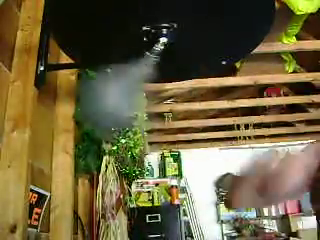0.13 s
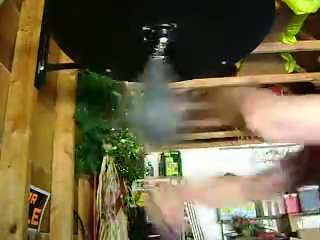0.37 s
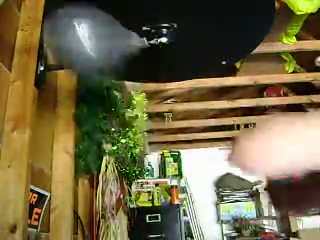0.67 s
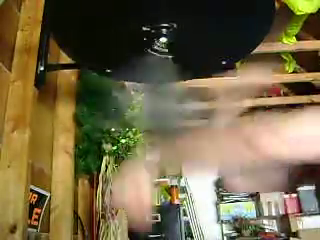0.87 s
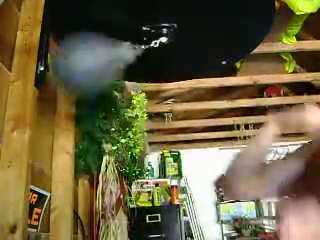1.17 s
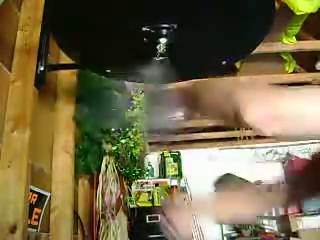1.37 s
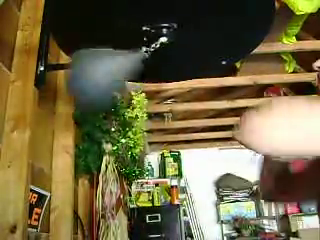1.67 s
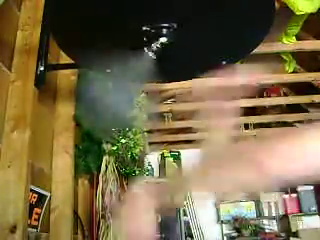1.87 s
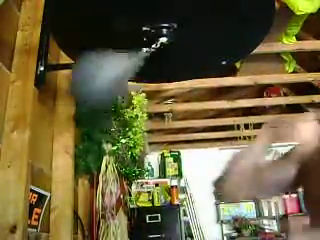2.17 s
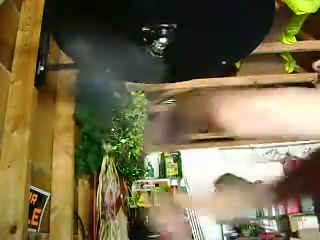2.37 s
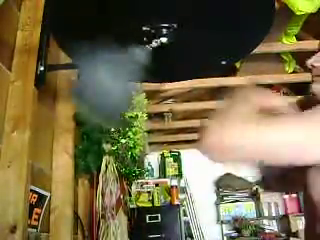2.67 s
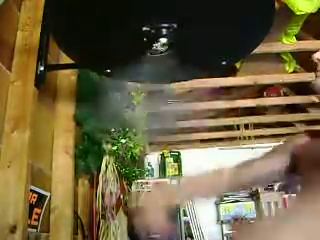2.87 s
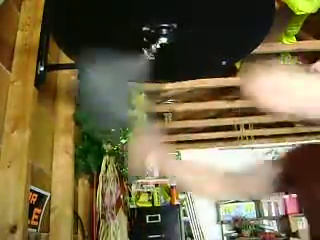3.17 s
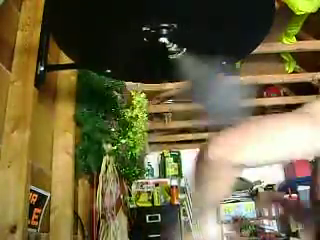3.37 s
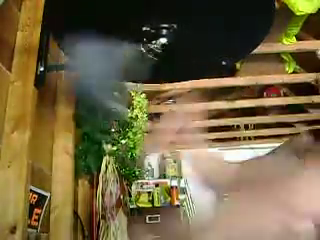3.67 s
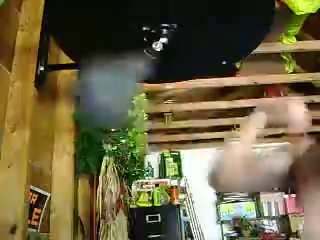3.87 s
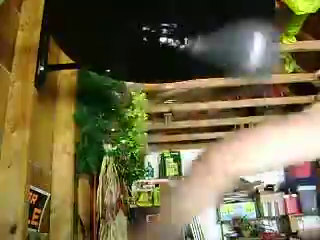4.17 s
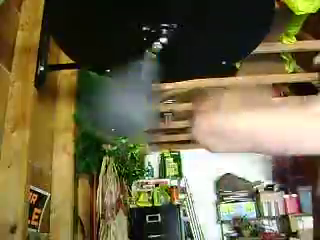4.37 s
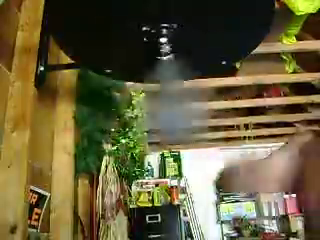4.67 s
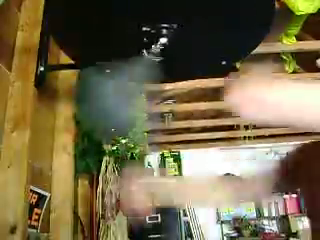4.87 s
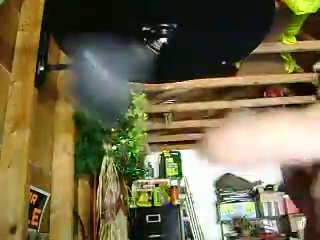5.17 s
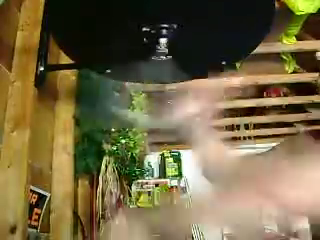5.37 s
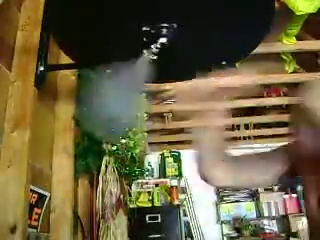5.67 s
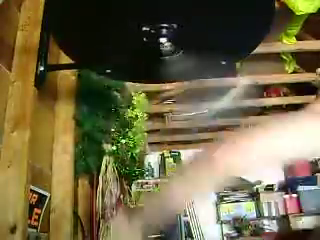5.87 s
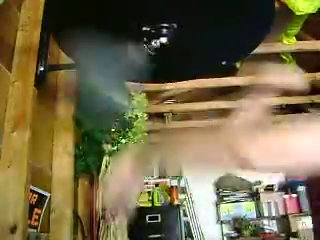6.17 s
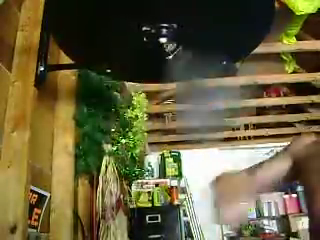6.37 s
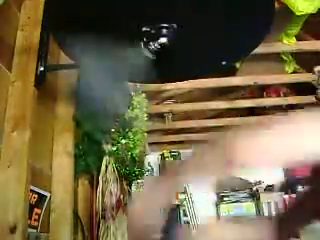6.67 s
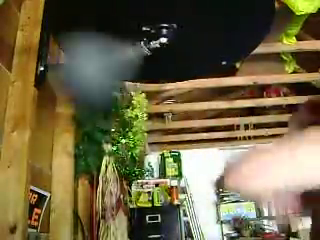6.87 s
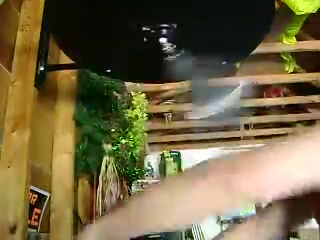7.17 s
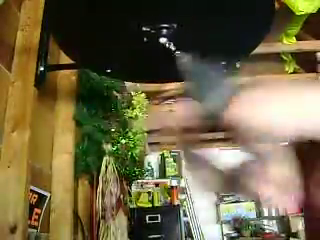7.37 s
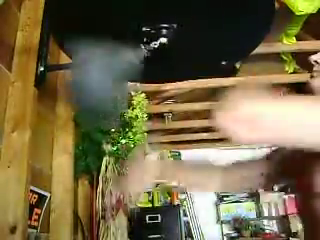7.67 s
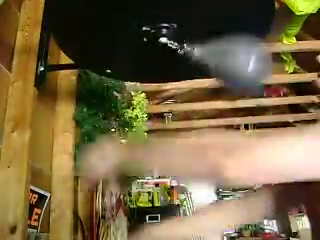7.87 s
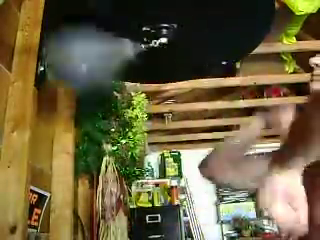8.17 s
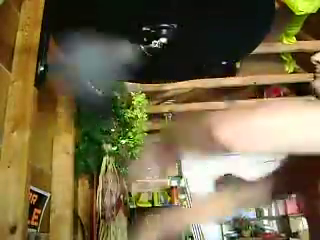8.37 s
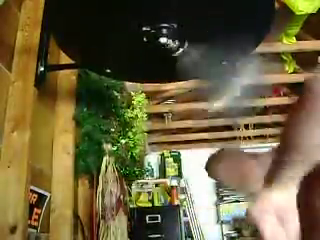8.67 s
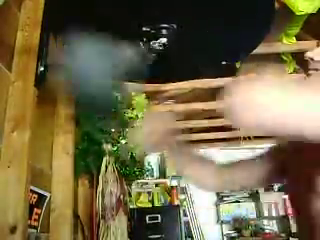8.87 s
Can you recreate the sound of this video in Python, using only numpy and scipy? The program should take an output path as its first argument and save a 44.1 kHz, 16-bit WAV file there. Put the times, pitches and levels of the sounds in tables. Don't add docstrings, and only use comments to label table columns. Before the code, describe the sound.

A leather speed bag rattles fast against its wooden rebound board in a garage, punched about twice a second, harsh and overloaded up close.

```python
import sys
import numpy as np
from scipy import signal
from scipy.fft import rfft, irfft, next_fast_len
from scipy.io import wavfile

SR = 44100
rng = np.random.default_rng(int(sys.argv[2]) if len(sys.argv) > 2 else 0)


def invert_db(x):
    u = np.asarray(x, float) / 20
    return 10 ** u


def to_wav(sig):
    pcm = np.clip(np.atleast_2d(sig), -1, 1) * 32767
    pcm = np.round(pcm).astype(np.int16)
    wavfile.write(sys.argv[1], SR, pcm.T)


N = 397782


def evened(x):
    return x / np.sqrt(np.mean(x ** 2) + 1e-20)


def peaked(x):
    return x / abs(x).max()


def read(points, hz):
    f, value = np.transpose(points)
    return np.interp(np.log(hz + 1), np.log(f + 1), value)


def coloured(x, points):
    size = next_fast_len(len(x))
    gain = invert_db(read(points, np.fft.rfftfreq(size, 1 / SR)))
    return irfft(rfft(x, size) * gain, size)[:len(x)]


def low_cut(x, order=4):
    return signal.sosfilt(signal.butter(order, 66, "high", fs=SR, output="sos"), x)


def add(mix, s, sound):
    part = mix[max(round(s * SR), 0):][:len(sound)]
    part += sound[:len(part)]


def ring(modes, seconds, spread, scatter_db):
    hz, db, t60 = np.transpose(modes)[:, :, None]
    pitch_luck, level_luck = rng.standard_normal((2, len(modes), 1))
    t = np.arange(round(seconds * SR)) / SR
    decay = invert_db(db + scatter_db * level_luck - 60 * t / t60)
    return (decay * np.sin(2 * np.pi * hz * (1 + spread * pitch_luck) * t)).sum(0)


# (time [s], slap level [dB], mount shake over slap [dB], contact [ms])
SECOND_REBOUNDS = [(.001, 2.5, -10, 4.2), (.494, 5, -17, 7.2), (1.002, 9.5, -16, 6.8),
                   (1.483, 6.5, -15, 10), (2.005, 0, -11.5, 6.8), (2.476, 2, -11.5, 3.1),
                   (2.918, 4, -12.5, 3), (3.326, 5.5, -17, 5.1), (3.763, 8.5, -17.5, 7.4),
                   (4.169, 3, -9.5, 5.9), (4.608, 5.5, -11.5, 8.1), (5.02, 4, -18.5, 7.4),
                   (5.458, 4.5, -8.5, 4.8), (5.871, 6, -13.5, 6.5), (6.3, 6.5, -14, 3.4),
                   (6.715, 4, -12.5, 7.8), (7.164, 4, -16, 8), (7.466, -2, -16, 6.5),
                   (7.808, 0.5, -18, 3.8), (8.112, -1, -15.5, 5.7), (8.436, -2, -9.5, 3.1),
                   (8.709, 1, -17, 8.8)]
# (time [s], slap level [dB], mount shake over slap [dB])
THIRD_REBOUNDS = [(.093, -2.5, -15), (.597, -9, -7.5), (1.099, .5, -15), (1.584, -2.5, -13),
                  (2.101, 0.5, -16), (2.568, -5.5, -11), (3.005, 4, -18), (3.419, -6.5, -14),
                  (3.852, -0.5, -17), (4.26, 0.5, -15.5), (4.693, -0.5, -13.5), (5.116, 3, -20.5),
                  (5.547, -1.5, -12), (5.963, 0.5, -13.5), (6.384, 4, -22), (6.807, 2, -15.5),
                  (7.265, -1, -17), (8.535, -12.5, -3.5)]
# (time [s], slap level [dB], mount shake over slap [dB])
SLUMPS = [(.123, -10.5, -13), (.627, -10, -11), (1.127, -21, -6), (1.617, -23, -19), (2.135, -11.5, -16),
          (2.595, -10.5, -12.5), (3.029, -10, -11.5), (3.446, -10.5, -8), (3.877, -9.5, -12),
          (4.721, -9, -15), (5.145, -10, -14), (5.573, -10.5, -26), (6.413, -14, -7), (6.834, -12, -13),
          (7.291, -7, -14.5), (7.435, -13, -25), (7.49, -7.5, -16), (7.625, -19, -17), (8.565, -16.5, -2),
          (8.654, -14.5, -16)]
# (time [s], slap level [dB], mount shake over slap [dB])
LAST_REBOUNDS = [(.253, -12, -8), (.756, -12.5, -11), (1.245, -6.5, -24.5), (1.742, -11, -12),
                 (2.257, -10.5, -16), (2.71, -8.5, -10.5), (3.135, -3.5, -22.5), (3.561, -9, -15),
                 (3.986, -10, -8.5), (4.396, -10, -10.5), (4.825, -13.5, -3.5), (5.259, -13.5, -13),
                 (5.678, -9, -11), (6.1, -10.5, -12.5), (6.507, -15, -4.5), (6.95, -9.5, -14),
                 (7.585, -7.5, -14), (7.933, -7.5, -12), (8.234, -16.5, -5), (8.831, -7.5, -19)]
# (time [s], slap level [dB], mount shake over slap [dB])
PUNCHES = [(0.353, -13, -3.5), (.857, -14, -10), (1.344, -9, -15), (1.862, -17, -29), (2.354, -11, -13),
           (2.797, -10.5, -10), (3.194, -13, -2), (3.636, -11, -4.5), (4.053, -9.5, -10),
           (4.482, -11, -14.5), (4.916, -10, -12.5), (5.329, -15, -12.5), (5.746, -14.5, 1.5),
           (6.178, -14, -6.5), (6.59, -11.5, -13), (7.053, -10, -9), (7.337, -17, -23), (7.676, -10, -13.5),
           (7.966, -22.5, 1), (8.319, -9.5, -12), (8.595, -10.5, -19), (8.906, -10.5, -12.5)]
# (time [s], slap level [dB], mount shake over slap [dB])
CATCHES = [(0.379, -23, 6), (0.431, -8.5, -1), (0.548, -7.5, -18), (0.952, -10, -3.5), (1.433, -15.5, 4),
           (1.988, -15, -12), (2.038, -5.5, -12), (2.438, -0.5, -8.5), (2.881, -6.5, -4),
           (3.651, -15, 11.5), (3.726, -4, -8.5), (4.069, -12.5, -18.5), (4.135, -6, -6.5),
           (4.573, 3, -14.5), (5.07, -11, -6), (5.395, -12, -1), (5.422, -1.5, -30), (6.268, -8, -4),
           (6.341, -11, -16), (6.605, -13, -2), (7.132, -6.5, -4.5), (7.415, -7, -13.5), (7.758, -11.5, 0),
           (8.079, -5, -18), (8.487, -13.5, -32), (8.677, 1, -22), (8.99, -5, -14)]
# (time [s], slap level [dB], mount shake over slap [dB], contact [ms])
FIRST_REBOUNDS = [(.395, 4, -18, 6.7), (.899, 5.5, -16.5, 4.5), (1.384, 3, -10.5, 4.5),
                  (1.916, 2.5, -14, 3.3), (2.393, 4, -15, 7.9), (2.832, 4, -12.5, 3.4),
                  (3.235, 5.5, -10.5, 5.2), (3.664, 2, -18, 3.5), (4.085, 3.5, -20.5, 5.6),
                  (4.516, 3.5, -14, 4.8), (4.93, -2, -6.5, 11), (5.348, -6, -5.5, 3.4), (5.782, 0, -7, 4.5),
                  (6.212, 6.5, -16.5, 3.4), (6.623, 2, -12, 4.1), (7.091, 9, -20.5, 6.1),
                  (7.354, -1.5, -5, 4.1), (7.722, 1, -15.5, 4.1), (8.027, -2.5, -9.5, 5.3),
                  (8.359, 3.5, -13.5, 2.6), (8.629, -0.5, -13, 10.7), (8.945, 2.5, -16, 7.1)]
# (thump over slap [dB], leather crack over slap [dB], contact [ms], air gap [Hz])
KINDS = [
    (-15.5, -22.5, 5, 720),
    (-18.5, -16.5, 6.44, 1050),
    (-18, -15, 6.9, 1050),
    (-29.5, -18, 3.7, 1050),
    (-31, -17.5, 3.7, 997),
    (-17.5, -20, 6.1, 800),
    (-19, -32.5, 11.4, 1250),
]
# (time [s], thump level [dB])
WEIGHT = [(0, -0.5), (1, -2.5), (1.8, -1.5), (2.4, 0.5), (3, 3), (4.3, 1), (5.5, 3), (6.4, 0.5), (7.2, 1.5),
          (7.6, -2), (9, 0.5)]
CLACK = (-25, -4, 17, 1000)
BRUSH = (-35, -28.5, 11, 1100.5)


def contacts():
    tables = (PUNCHES, FIRST_REBOUNDS, SECOND_REBOUNDS, THIRD_REBOUNDS, LAST_REBOUNDS, CATCHES, SLUMPS)
    rows = []
    for table, (thump, crack, usual_ms, gap) in zip(tables, KINDS):
        for s, slap, shake, *own_ms in table:
            ms = own_ms[0] if own_ms else usual_ms
            rows.append((s, slap, thump, crack, ms, gap, shake))
    for table, clack_db in ((LAST_REBOUNDS, -14), (PUNCHES, -15)):
        for s, slap, shake in table:
            rows.append((s + 0.010, slap + clack_db, *CLACK, shake))
    for s, slap, shake in LAST_REBOUNDS + THIRD_REBOUNDS:
        rows.append((s - 0.0081, slap - 14, *BRUSH, shake))
    rows = np.array(rows)
    rows[:, 2] += np.interp(rows[:, 0], *np.transpose(WEIGHT))
    return rows


# (frequency [Hz], level [dB])
BOARD = [(250, -26.5), (400, -66.5), (600, -10), (850, -12.5), (1100, 19), (1300, -3), (1700, 16.5),
         (2700, -21.5), (3300, 7.5), (5600, -16.5)]
# (frequency [Hz], t60 [s])
BOARD_RING = [(250, .04), (600, .035), (1300, .022), (3000, .012), (5600, .008)]


def board_modes(count=90):
    place = (np.arange(count) + rng.random(count)) / count
    hz = 260 * (5600 / 260) ** place
    return np.c_[hz, read(BOARD, hz) + 5 * np.log10(hz / 1000), read(BOARD_RING, hz)]


# (frequency [Hz], level [dB], t60 [s])
FRAME = [(80, 1, 0.1), (98, -3.5, 0.12), (122, 2, 0.06), (141, 2, 0.1), (166, 4.5, 0.08), (215, -5, 0.04)]
# (frequency [Hz], level [dB], t60 [s])
BAG_AIR = [(599.7, -3, 0.083), (567.4, -9, 0.13), (1255.5, -2.5, 0.071)]


def contact(board_ring, slap_db, thump_db, crack_db, ms, gap_hz=950):
    t = np.arange(3000) / SR
    u = t / (max(ms, .5) / 1000)
    first_touch = 1.1
    pressure = (1 - np.exp(-t / .0003)) * np.exp(-u ** 2)
    pressure *= (1 + first_touch * np.exp(-t / .0015)) / (1 + first_touch / 2)
    gap_noise, leather_noise = rng.standard_normal((2, len(t)))

    wandering_t = t + 0.00058 * np.cumsum(gap_noise) / 30
    squeeze = pressure * np.sin(2 * np.pi * gap_hz * rng.uniform(0.78, 1.4) * wandering_t)
    blow = gap_noise[:900] * pressure[:900]

    push = signal.windows.hann(round(0.0032 * SR))
    thump = -peaked(signal.fftconvolve(push, ring(FRAME, .2, .02, 2)))

    creak = 0.12 * np.exp(-t / 0.0071) + 0.055 * np.cos(np.pi / 2 * t / t[-1]) ** 2
    leather = signal.lfilter(*signal.butter(2, (2700, 6300), "band", fs=SR), leather_noise)
    crack = leather * (pressure * np.exp(-.4 * u) + creak)

    smack = (1 - t / 0.000094) * np.exp(-t / 0.00011)

    slap = np.zeros(round(.25 * SR))
    add(slap, 0, peaked(signal.fftconvolve(blow, board_ring)))
    add(slap, 0, invert_db(-5.5) * peaked(signal.fftconvolve(blow, ring(BAG_AIR, 0.23, 0.02, 5.0))))
    add(slap, 0, invert_db(6.0) * squeeze)
    add(slap, 0, invert_db(thump_db + 19) * smack)
    out = peaked(slap)
    add(out, .0025, invert_db(thump_db + 6.5) * thump)
    add(out, .0004, invert_db(crack_db + 8) * peaked(crack))
    return invert_db(slap_db + 1.5) * out


def bag(count=40):
    spots = [ring(board_modes(), .06, .001, 5.3) for _ in range(count)]
    out, rows = np.zeros(N), contacts()
    delay_s = .0007
    luck = rng.standard_normal((len(rows), 3))
    for k, (s, slap_db, thump_db, crack_db, ms, gap_hz, _) in enumerate(rows):
        thump_db += 2.5 * luck[k, 0]
        crack_db += 2.5 * luck[k, 1]
        ms *= np.exp(0.25 * luck[k, 2])
        add(out, s + delay_s, contact(spots[k % count], slap_db, thump_db, crack_db, ms, gap_hz))
    return out


# (frequency [Hz], level per Hz [dB])
RATTLE = [(150, -22), (250, -9.5), (285, -13.5), (447, -4), (575, 0.5), (656, 1), (1270, -2.5), (1370, -5),
          (2730, -18.5), (4640, -22.5), (5360, -26), (5880, -23), (7640, -40), (12900, -120)]


def mount():
    s, slap_db, thump_db, _, _, _, shake_db = contacts().T
    kicks = np.zeros((2, N))
    kicks[:, (s * SR).astype(int)] = invert_db([slap_db + shake_db, slap_db + thump_db])
    kicks[:, 0] = invert_db([-17, -40])
    t = np.arange(SR // 2) / SR
    build = 1 - np.exp(-(t / .012) ** 2)
    settle = [build * invert_db(-4.0 - 60 * t / 0.43), build * invert_db(-3.5 - 60 * t / 0.46)]
    energy = signal.fftconvolve(kicks ** 2, np.square(settle), axes=1)[:, :N]
    shake, sway = np.sqrt(abs(energy))

    knock_db = 2.2 * np.minimum(rng.exponential(1, N), 3)
    knocks = invert_db(knock_db) * (rng.random(N) < 1400 / SR)
    chatter = signal.oaconvolve(knocks, np.exp(-t[:800] / 0.0035))[:N] * rng.standard_normal(N)
    rumble = signal.oaconvolve(rng.standard_normal(N), ring(FRAME, .2, .001, .1))[:N]
    return shake * evened(coloured(chatter, RATTLE)) + invert_db(-5.5) * sway * evened(rumble)


# (frequency [Hz], t60 [s])
GARAGE = [(100, 0.69), (400, 0.63), (1000, 0.35), (2500, 0.58), (5500, 0.35)]


def garage(x):
    taps = np.zeros((3, SR // 2))
    slots = np.arange(260, SR // 2 - 20, 20)
    at = slots + rng.integers(0, 20, (3, (SR // 2 - 261) // 20))
    np.put_along_axis(taps, at, rng.choice([-1., 1.], at.shape), 1)
    hz, t, z = signal.stft(taps, SR, nperseg=256)
    decay = invert_db(-60 * t / read(GARAGE, hz)[:, None])
    tails = signal.istft(z * decay, SR, nperseg=256)[1]
    turn = 2 * np.pi * (3.7 * np.arange(N) / SR + np.arange(3)[:, None] / 3)
    share = np.sqrt((1 + np.cos(turn)) / 3)
    return signal.fftconvolve(x * share, tails / np.linalg.norm(tails[0]), axes=1)[:, :N].sum(0)


def scene():
    near = low_cut(bag() + mount())
    return (near + invert_db(-12.5) * garage(near))[None]


# (frequency [Hz], level per Hz [dB])
AIR = [(10, 2.5), (22, 19.5), (36, 11.5), (100, 11.5), (340, -9.5), (1000, 3), (2800, -12), (6000, -45.5)]


def still_air():
    return invert_db(-38.5) * evened(coloured(rng.standard_normal(N), AIR))


def low_pass(x):
    return signal.sosfilt(signal.butter(12, 15900, fs=SR, output="sos"), x)


def record(dry):
    mic_limit, ceiling = 0.64, .7
    overloaded = low_cut(np.clip(dry, -mic_limit, mic_limit), order=2) + still_air()
    band = signal.firwin(145, 5543, window=("kaiser", 9), fs=SR)
    narrow = signal.oaconvolve(overloaded, band[None], "same")
    mix = np.clip(narrow, -ceiling, ceiling)
    return low_pass(mix)


dry = scene()
out = record(dry)
to_wav(out)
```